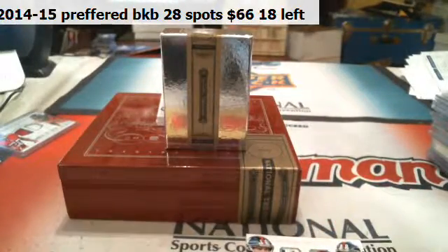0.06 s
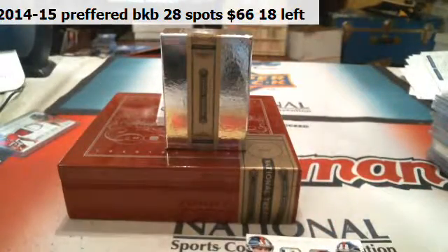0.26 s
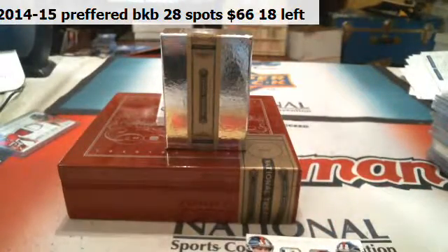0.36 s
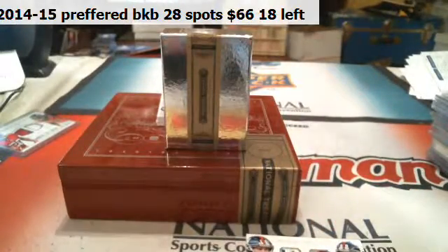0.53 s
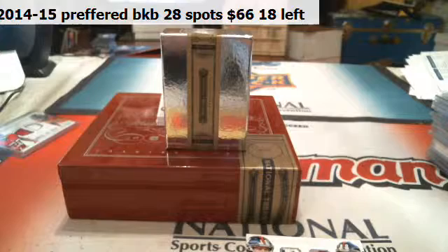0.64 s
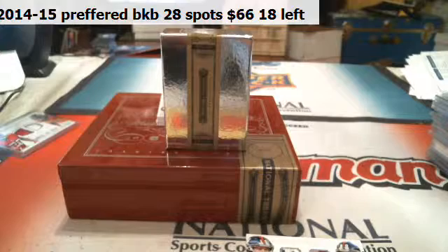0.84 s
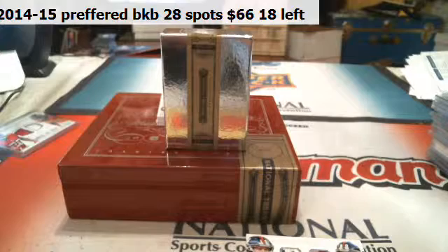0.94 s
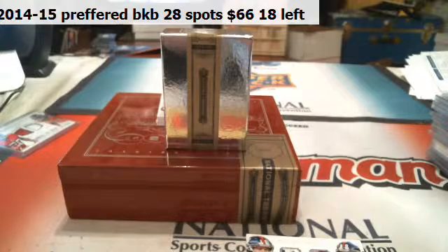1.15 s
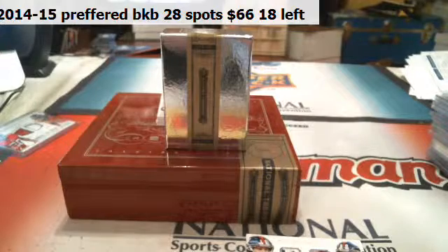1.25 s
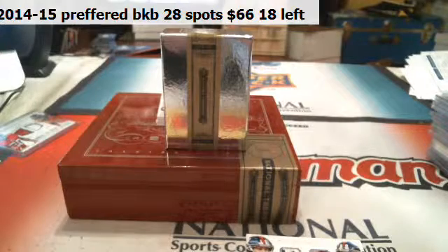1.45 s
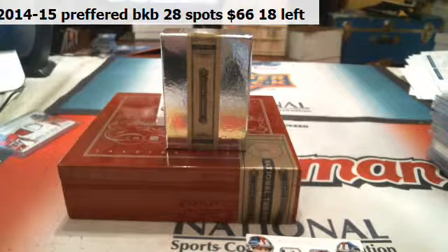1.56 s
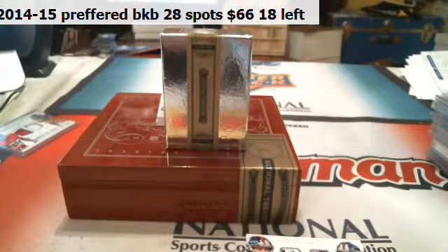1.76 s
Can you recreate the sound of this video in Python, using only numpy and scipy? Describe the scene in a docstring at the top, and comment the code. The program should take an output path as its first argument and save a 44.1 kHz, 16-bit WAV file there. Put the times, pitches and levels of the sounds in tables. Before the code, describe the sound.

Stiff plastic card sleeves crinkle close up. Light ticks begin near 0.14 s and thicken into the loudest, sharp snaps and scratchy rubbing at 0.4-0.6 s, with low, soft table bumps. Near-quiet with faint ticks follows until about 1.0 s. Crackling rebuilds, busy from 1.1 to 1.45 s, with a brief bright scrape at 1.54 s, then fades into faint room rumble and hum.

```python
"""Stiff plastic card sleeves snap as they are shuffled about on a table in a quiet furnished room.
Each buckle of the film is a handful of tiny cracks and a shiver, with a short ring at its own pitch.
Squeezed air pockets pip, the stack bumps the table, and the sleeves rub with a fine, clumped crackle
of ringing grains over hiss. A short, noisy tail follows the snaps, pips and bumps.
A faint wavering mains hum and room rumble, made from a sine and coloured noise, lie underneath."""
import sys
import numpy as np
from scipy import signal
from scipy.fft import rfft, irfft
from scipy.io import wavfile

SR = 44100
rng = np.random.default_rng(int(sys.argv[2]) if len(sys.argv) > 2 else 0)


def gain_from_db(level_db):
    """Convert decibel levels to linear amplitude factors (20 dB per decade)."""
    decades = np.asarray(level_db, float) / 20
    return 10 ** decades


def dump(signal):
    """Clip the signal to [-1, 1] and save it as 16-bit WAV at the path in sys.argv[1]."""
    limited = np.clip(np.atleast_2d(signal).T, -1, 1)
    pcm = np.round(limited * 32767).astype(np.int16)
    wavfile.write(sys.argv[1], SR, pcm)


N = 79380  # length in samples, 1.8 s

# The dull, middle and bright parts of the plastic sound, one row each: low_hz, high_hz
PLASTIC_BANDS = [(560, 1800), (1500, 6910), (4500, 9860)]


def rms_one(x):
    """Scale to rms 1."""
    return x / np.sqrt(np.mean(x ** 2) + 1e-20)


def band(x, low_hz, high_hz):
    """Steep Butterworth band-pass."""
    sos = signal.butter(3, [low_hz, high_hz], "band", fs=SR, output="sos")
    return signal.sosfilt(sos, x + 1e-18)


def drift(rate_hz):
    """Random wander of rms 1: white noise through two equal low-pass poles at rate_hz."""
    pole = np.exp(-2 * np.pi * rate_hz / SR)
    noise = rng.standard_normal(N + SR)
    settled = signal.lfilter([1], [1, -2 * pole, pole * pole], noise)[SR:]
    return rms_one(settled)


def ring(clicks, hz, cycles):
    """A unit click sets a sine of height 1 ringing, 60 dB down after so many cycles."""
    decay = gain_from_db(-60 * hz / (cycles * SR))
    turn = 2 * np.pi * hz / SR
    return signal.lfilter([0, np.sin(turn)], [1, -2 * decay * np.cos(turn), decay ** 2], clicks + 1e-18)


def snaps():
    """Buckling film: fading cracks and a shiver, levelled in three bands, excite a short pitched ring."""
    # Each buckle of the film: start_s, middle_peak_db, ring_hz, dull_mean_db, bright_mean_db
    buckles = [(0.141, -47.5, 1440, -56.5, -73), (0.152, -39, 980, -53.5, -56),
               (0.2066, -35, 4020, -75, -37.5), (0.2323, -31.5, 8100, -60, -38),
               (0.2605, -38, 1390, -50, -50), (0.2829, -46, 1530, -55, -63),
               (0.2914, -46, 7230, -59, -44.5), (0.3098, -40.5, 1110, -65, -60),
               (0.356, -35, 4100, -58, -44), (0.3645, -48, 5020, -73, -78), (0.374, -49, 2310, -71, -64),
               (0.389, -37.5, 2570, -43.5, -35.5), (0.4057, -31.5, 723, -41.5, -40),
               (0.4148, -28, 1605, -50, -35), (0.432, -45, 1630, -42, -36),
               (0.4405, -28.5, 1194, -41.5, -33), (0.4424, -16.5, 1664, -29, -28),
               (0.4473, -23, 477, -36.5, -32), (0.4554, -29, 930, -39.5, -33), (0.468, -37, 1870, -47, -42),
               (0.5038, -21.5, 4630, -39, -24.5), (0.5136, -32, 4430, -53, -26),
               (0.5168, -37, 2970, -35.5, -28), (0.5215, -47, 474, -41.5, -30),
               (0.5396, -24.5, 1780, -36, -31), (0.5522, -28, 910, -51, -31),
               (0.576, -37, 7370, -44.5, -29), (0.589, -39.5, 8400, -48.5, -45.5),
               (0.595, -35.5, 1150, -51.5, -36), (0.631, -49, 1600, -56.5, -46),
               (0.711, -61, 6170, -75, -47), (0.748, -60, 1170, -66, -48), (0.7704, -54, 7460, -77, -51.5),
               (0.8332, -56, 2260, -58, -72), (0.846, -43, 1230, -56.5, -43),
               (0.8728, -42.5, 2200, -58, -50), (0.8924, -48, 670, -56, -56.5),
               (0.9731, -55.5, 4700, -72, -65), (0.9923, -44.5, 2090, -54, -45),
               (1.0185, -52, 2130, -53.5, -56), (1.028, -50, 2140, -55, -58), (1.0355, -43, 976, -50, -60),
               (1.0506, -49, 2130, -56, -44), (1.058, -42, 3400, -66, -53), (1.0772, -45, 2190, -65, -58),
               (1.0912, -40, 5660, -62.5, -52.5), (1.118, -38.5, 2120, -49, -48.5),
               (1.1271, -34, 2170, -48, -41.5), (1.1448, -40, 2170, -40.5, -47),
               (1.1575, -35.5, 3730, -38.5, -52), (1.1662, -46.5, 1550, -53.5, -56),
               (1.1794, -49, 1500, -51, -55), (1.1904, -31, 3440, -44, -25), (1.2019, -40, 590, -48, -59),
               (1.2174, -47.5, 1610, -50, -48.5), (1.2287, -32, 7900, -56, -40.5),
               (1.2443, -32.5, 1910, -43.5, -45.5), (1.2662, -44, 5930, -54, -40),
               (1.283, -34.5, 5900, -62, -29.5), (1.2996, -25, 1038, -43.5, -37),
               (1.3114, -23.5, 918, -41, -35.5), (1.3225, -38.5, 2170, -46, -48.5),
               (1.3493, -40, 4540, -46, -53), (1.3585, -33, 2340, -42, -52),
               (1.3655, -42.5, 3160, -46, -41), (1.4232, -31, 1810, -42, -32.5),
               (1.4335, -44, 1060, -49, -52.5), (1.4501, -43, 3250, -48, -51),
               (1.4552, -46.5, 3100, -56, -64.5), (1.501, -64.5, 1640, -64, -46.5),
               (1.5361, -35.5, 2180, -53, -33), (1.5441, -35.5, 5600, -65, -50.5),
               (1.5539, -36, 5200, -74, -70), (1.5653, -35.5, 2580, -51, -60),
               (1.5827, -43, 2460, -63, -60), (1.5928, -38.5, 3230, -68, -75),
               (1.6377, -64, 3230, -70.5, -76)]
    cracks_per_snap, first_crack_s, gap_s = 4, .0006, .0014  # each gap is scaled at random
    crack_loss_db, crack_spread_db = 3.5, 3.5  # loss per crack, random spread
    shiver_db, shiver_rise_s, shiver_t60_s = -17, 0.00063, .015  # level before the three-band levelling
    crest_db = 3  # peak of a crack over its mean level
    ring_cycles = 16
    size = SR // 16
    t, k = np.arange(size) / SR, np.arange(cracks_per_snap)
    shiver_shape = gain_from_db(shiver_db - 60 * t / shiver_t60_s) * (1 - np.exp(-t / shiver_rise_s))
    out = np.zeros(N + size)
    for start_s, middle_db, hz, dull_db, bright_db in buckles:
        gaps = rng.uniform(0.72, 1.6, len(k))
        crack_s = first_crack_s + gap_s * (np.cumsum(gaps) - gaps[0])
        heights = gain_from_db(crack_spread_db * rng.standard_normal(len(k)) - crack_loss_db * k)
        cracks = np.zeros(size)
        cracks[(SR * crack_s).astype(int)] = (-1.) ** k * heights  # alternating signs
        burst = cracks + shiver_shape * rng.standard_normal(size)

        peaks_db = [dull_db + crest_db, middle_db, bright_db + crest_db]
        snap = np.zeros(size)
        for (low, high), peak_db in zip(PLASTIC_BANDS, peaks_db):
            part = band(burst, low, high)
            snap += gain_from_db(peak_db) * part / np.abs(part).max()

        # the ring takes the level of the part its pitch falls in
        tone = band(ring(burst, hz, ring_cycles), hz / 2, hz * 2)
        tone_db = peaks_db[np.searchsorted([high for _, high in PLASTIC_BANDS[:2]], hz)]
        snap += gain_from_db(tone_db) * tone / np.abs(tone).max()
        i = int(start_s * SR)
        out[i:i + size] += snap
    return out[:N]


def pips():
    """A squeezed air pocket gives a clear tone that swells and fades within a few milliseconds."""
    # Each squeeze of a pocket: start_s, peak_db, pitch_hz
    squeezes = [(0.7469, -44.5, 2416), (0.998, -54.5, 2100), (1.006, -49.5, 1630), (1.0913, -47.5, 2120),
                (1.287, -40.5, 2280)]
    size = int(.007 * SR)  # 7 ms
    out = np.zeros(N)
    for start_s, peak_db, hz in squeezes:
        i = int(start_s * SR)
        tone = np.sin(2 * np.pi * hz * np.arange(size) / SR)
        out[i:i + size] += gain_from_db(peak_db) * np.hanning(size) * tone
    return out


def bumps():
    """The stack bumps the table: a soft push one cycle long sets the top ringing low."""
    # Each bump of the stack: start_s, peak_db, pitch_hz
    knocks = [(0.002, -58, 407), (.31, -64, 264), (0.363, -57, 400), (0.444, -46.5, 320), (0.489, -41, 388),
              (0.515, -46, 298), (1.142, -58, 233), (1.54, -59, 405), (1.61, -72.5, 61),
              (1.681, -54.5, 553), (1.704, -58, 533)]
    out = np.zeros(N)
    for start_s, peak_db, hz in knocks:
        i, size = int(start_s * SR), int(SR / hz)
        push = np.zeros(N)
        push[i:i + size] = np.hanning(size) * np.sin(2 * np.pi * np.arange(size) / size)
        tone = ring(push, hz, cycles=25)
        out += gain_from_db(peak_db) * tone / np.abs(tone).max()
    return out


def rubbing():
    """Clumped grains ring at scattered pitches over hiss; gaping sleeves' air pockets colour them."""
    # Strength of the rubbing over time: time_s, middle_db, dull_db, bright_db
    rub_levels = [(0, -55.5, -66, -58.5), (0.029, -75, -83.5, -73.5), (.07, -98, -83, -103),
                  (0.133, -76, -79.5, -94), (0.142, -59.5, -62.5, -69), (.17, -63.5, -76, -67),
                  (0.201, -69, -82, -97), (0.209, -69, -92, -54.5), (0.254, -58, -95, -57.5),
                  (.275, -70, -66.5, -77), (.33, -63.5, -69, -76), (0.353, -69, -88, -99),
                  (0.359, -88, -56, -63), (0.382, -60, -73, -69), (.43, -47, -49.5, -52),
                  (0.452, -42.5, -47.5, -53), (0.493, -50, -53, -57), (0.518, -42, -44.5, -39),
                  (.56, -51, -61.5, -50.5), (0.619, -71.5, -62.5, -62.5), (0.667, -77, -99, -72.5),
                  (.68, -82, -83, -91), (0.707, -89, -86, -82), (0.715, -93, -78, -65),
                  (0.786, -72, -80, -66.5), (.81, -83, -81, -83), (.83, -76, -83, -92),
                  (0.847, -65, -108, -59.5), (0.901, -66.5, -61.5, -75.5), (.94, -83, -91, -81),
                  (.985, -74, -80, -82), (0.994, -65.5, -63, -70), (1.11, -60, -85, -60.5),
                  (1.146, -49.5, -54.5, -55), (1.25, -53, -67, -50), (1.28, -57, -77, -61.5),
                  (1.318, -46, -57, -50), (1.343, -60.5, -61.5, -64.5), (1.44, -50.5, -67.5, -53),
                  (1.485, -81, -84, -80.5), (1.53, -65.5, -105, -64), (1.538, -37, -83, -50.5),
                  (1.56, -62, -88, -59.5), (1.598, -66, -91, -61), (1.634, -85.5, -87, -94),
                  (1.681, -81.5, -79, -102), (1.782, -91, -79, -104), (1.8, -69, -64.5, -80)]
    # A sleeve gapes around a resonant air pocket: start_s, end_s, pitch_hz, level_db
    air_pockets = [(0.202, 0.36, 1260, -75), (0.746, 0.776, 1180, -69.5), (0.704, .79, 2450, -70.5),
                   (0.833, 0.868, 2560, -61.5), (0.978, 1.106, 2130, -63.5), (1.154, 1.257, 2140, -62)]
    grains_per_s, grain_cycles, grain_spread_db = 2200, 5, 4  # rate before clumping
    clump_rate_hz, clump_db = 91, 3.5
    hiss_share = 0.43  # of the power
    pitches = 8  # grain pitches per band
    pocket_cycles, gape_s = 18, 0.0083  # ring length, time to open or close
    t = np.arange(N) / SR
    time_s, middle_db, dull_db, bright_db = np.transpose(rub_levels)

    heights = gain_from_db(grain_spread_db * np.minimum(rng.exponential(1, N), 4)) * rng.choice([-1, 1], N)
    clump = gain_from_db(clump_db * drift(clump_rate_hz))
    born = rng.random(N) < grains_per_s * clump / SR
    clicks = heights * born
    pitch_index = rng.integers(0, pitches, N)

    out = np.zeros(N)
    for (low, high), level_db in zip(PLASTIC_BANDS, (dull_db, middle_db, bright_db)):
        grains = np.zeros(N)
        for k, hz in enumerate(np.geomspace(low, high, pitches)):
            grains += ring(clicks * (pitch_index == k), hz, grain_cycles)
        crackle = rms_one(band(grains, low, high))
        hiss = rms_one(clump * band(rng.standard_normal(N), low, high))
        mix = np.sqrt(1 - hiss_share) * crackle + np.sqrt(hiss_share) * hiss
        out += gain_from_db(np.interp(t, time_s, level_db)) * mix

    for start_s, end_s, hz, level_db in air_pockets:
        gape = np.clip(np.minimum(t - start_s, end_s - t) / gape_s, 0, 1)
        out += gain_from_db(level_db) * gape * rms_one(ring(clicks * clump, hz, pocket_cycles))
    return out


def reflections(x):
    """Table and walls return a dense, broad-band, quickly dying tail."""
    t60_s, rise_s, wet_db = .1, 0.019, -15
    t = np.arange(SR // 3) / SR
    noise = rms_one(band(rng.standard_normal(len(t)), 270, 12200))
    tail = noise * gain_from_db(-60 * t / t60_s) * np.minimum(t / rise_s, 1)
    tail = tail / np.sqrt(np.sum(tail ** 2))  # unit energy
    return gain_from_db(wet_db) * signal.fftconvolve(x, tail)[:N]


def room_tone():
    """Coloured steady noise and a wavering mains line."""
    # Colour of the room noise, relative levels: frequency_hz, density_db (per Hz)
    noise_colour = [(18, -38.5), (30, -6), (113, 5.5), (328, 8.5), (426, -3), (581, -55.5), (754, -29.5),
                    (1270, -30), (2370, -26.5), (15000, -30)]
    noise_db = -74.5  # rms
    hum_hz, hum_db, waver_db, waver_rate_hz = 120.5, -78, 1.5, 12.0  # hum_db is rms before the waver
    colour_hz, colour_db = np.transpose(noise_colour)
    hz = np.maximum(np.fft.rfftfreq(N, 1 / SR), 1)
    colour = gain_from_db(np.interp(np.log(hz), np.log(colour_hz), colour_db))
    noise = irfft(rfft(rng.standard_normal(N)) * colour, N)
    hum_level = np.sqrt(2) * gain_from_db(hum_db + waver_db * drift(waver_rate_hz))
    hum = hum_level * np.sin(2 * np.pi * hum_hz * np.arange(N) / SR)
    return gain_from_db(noise_db) * rms_one(noise) + hum


def scene():
    """Cards, their reflections, the rubbing and the room, in one channel."""
    cards = snaps() + pips() + bumps()
    mix = cards + reflections(cards) + rubbing() + room_tone()
    return mix[None]


def low_pass(x):
    """Removes everything above the highest recorded frequency."""
    return signal.sosfilt(signal.butter(12, 16240, fs=SR, output="sos"), x)


def record(dry):
    """The microphone rolls off the top above 15 kHz."""
    rolloff = signal.butter(2, 15000, fs=SR, output="sos")
    finished = signal.sosfilt(rolloff, dry)
    return low_pass(finished)


dry = scene()
out = record(dry)
dump(out)
```